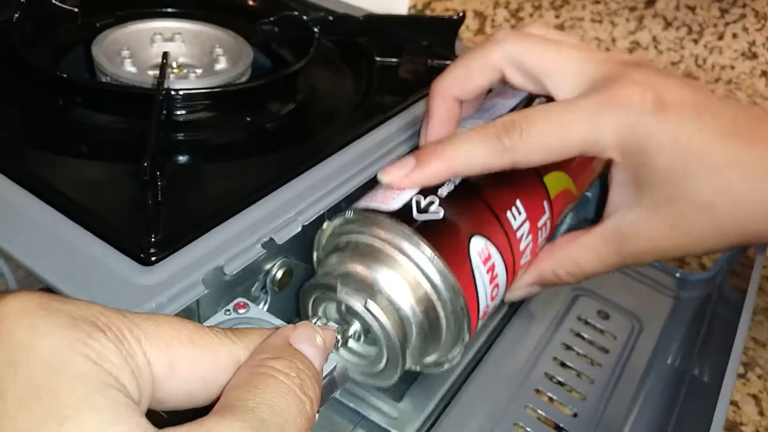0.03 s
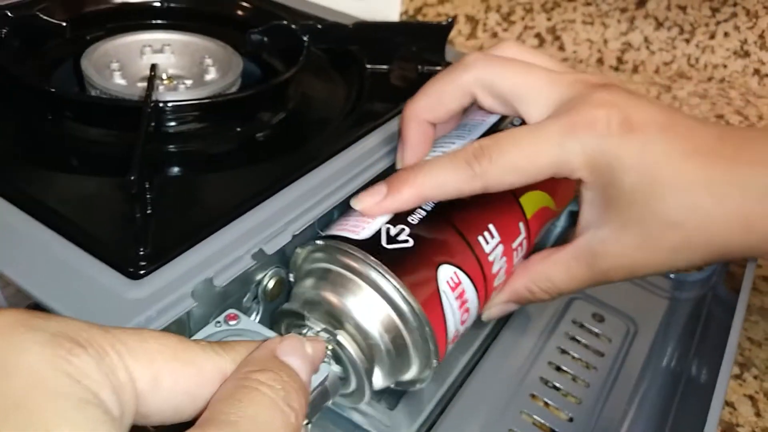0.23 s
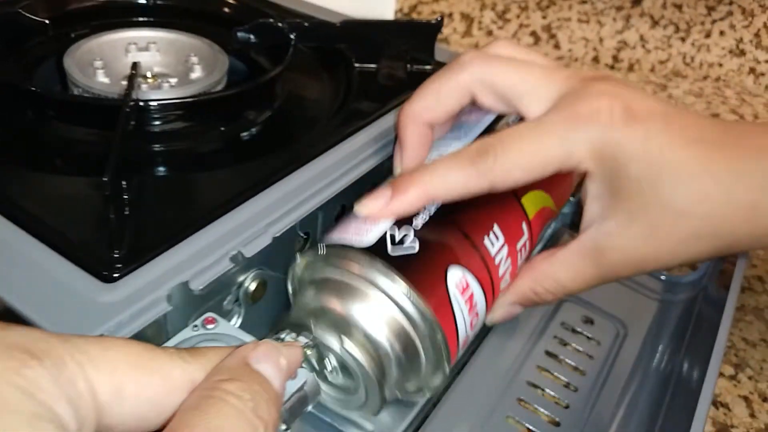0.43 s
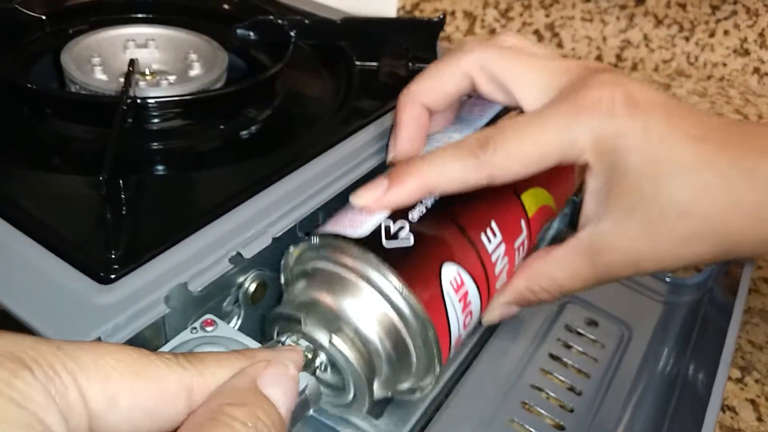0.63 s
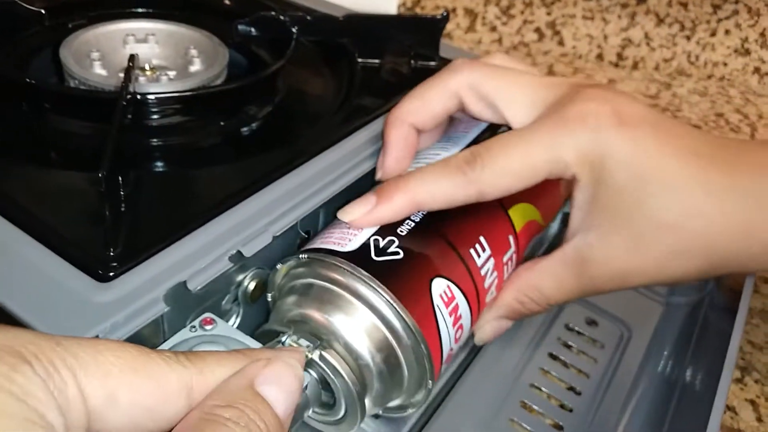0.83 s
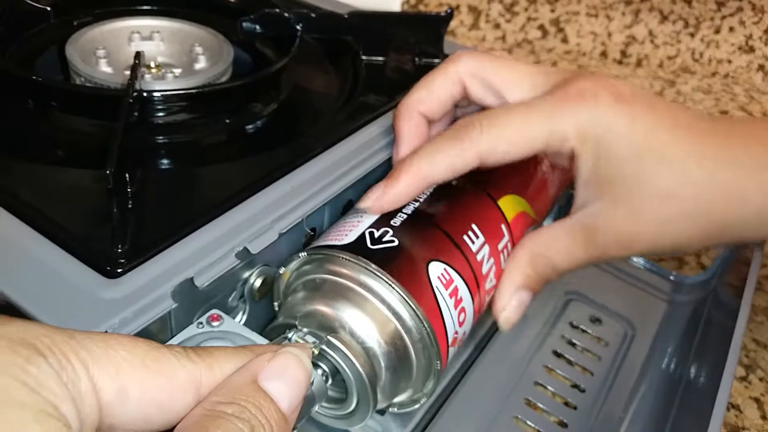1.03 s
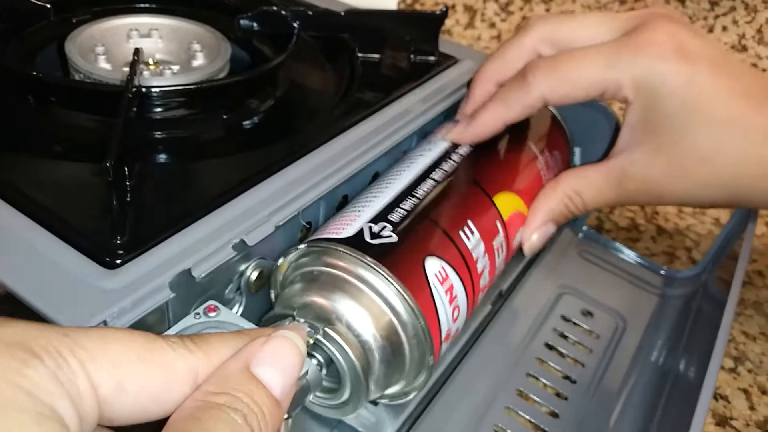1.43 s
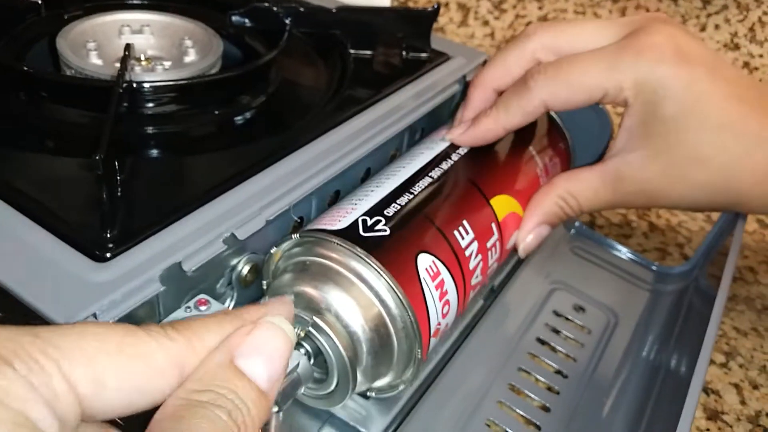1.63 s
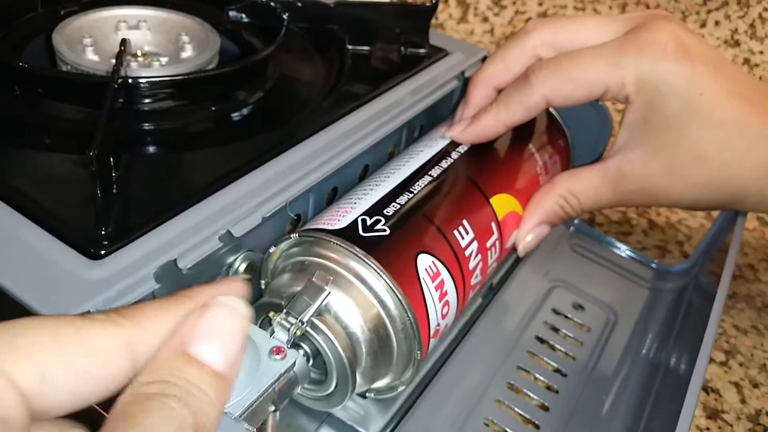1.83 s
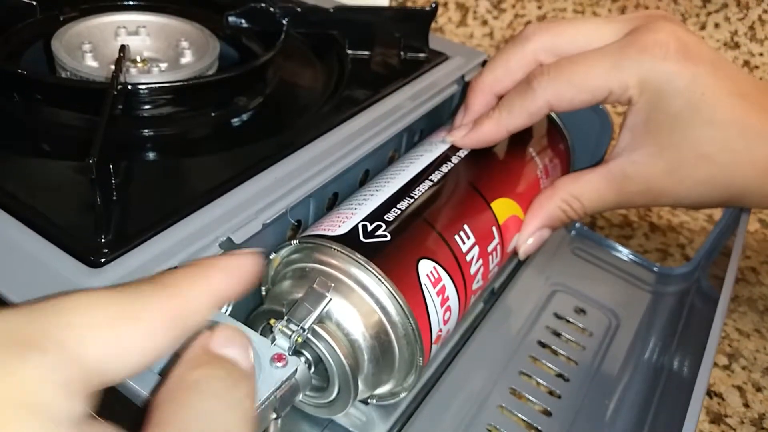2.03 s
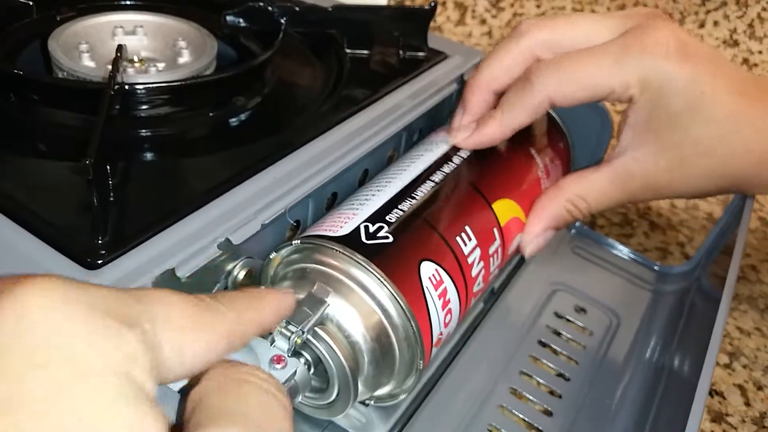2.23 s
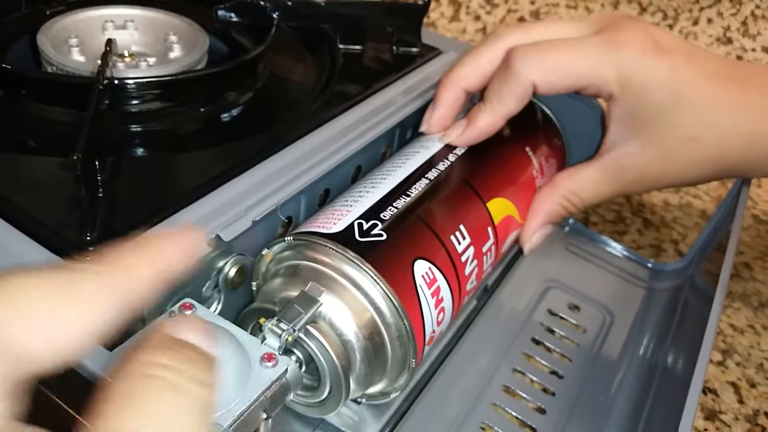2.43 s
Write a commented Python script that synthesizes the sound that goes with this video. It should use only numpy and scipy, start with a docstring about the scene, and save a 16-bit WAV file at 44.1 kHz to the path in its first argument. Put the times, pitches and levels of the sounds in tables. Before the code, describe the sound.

A metal gas canister knocks and rubs against a portable stove, with briefly ringing clanks around 0.2 and 0.4 seconds and lighter taps after. It drops into place with a loud clunk at 1 second and knocks again at 1.5. The locking lever clamps sharply at 1.7. Soft finger thuds follow, then a catch snaps with a clank near 2.25 seconds, over faint hiss and hum in a quiet kitchen.

```python
"""Quiet kitchen: a steel gas canister is seated in a portable stove and clamped by the locking lever.
The can rubs, knocks and rattles against collar and sheet-metal tray, and drops home with a thump.
Knocks of can and lever ring crowded and distinct metal modes. Fingers push on the case;
the lever's spring catch snaps. The room reflects it all over faint hiss and a hollow hum."""
import sys
import numpy as np
from scipy import signal
from scipy.io import wavfile

SR = 44100
rng = np.random.default_rng(int(sys.argv[2]) if len(sys.argv) > 2 else 0)


def generate_wav(signal):
    """Clip the signal to [-1, 1] and save it as 16-bit WAV at the path in sys.argv[1]."""
    frames = np.transpose(np.atleast_2d(signal))
    scaled = np.clip(frames, -1, 1) * 32767
    pcm = np.round(scaled).astype(np.int16)
    wavfile.write(sys.argv[1], SR, pcm)


N = 114660
TIME_S = np.arange(N) / SR
EDGES_HZ = np.geomspace(25, 17000, 29)
CENTRES_HZ = np.sqrt(EDGES_HZ[1:] * EDGES_HZ[:-1])
BASS_HZ, BODY_HZ, TREBLE_HZ = 650, 2490, 9000

# hiss spectrum: f/Hz, relative density/dB
HISS_SPECTRUM = [(30, -33), (150, -33), (450, -5), (1000, -2.5), (2000, -19), (5000, -27.5), (16000, -32)]
# can sliding: t/s, level/dB
RUB_LEVELS = [(0, -51), (.11, -63), (.16, -44), (.5, -48.5), (.7, -48.5), (.92, -43), (1.2, -42),
              (1.25, -47.5), (1.3, -43), (1.37, -61), (1.44, -52), (1.5, -41), (1.58, -55), (1.97, -47.5),
              (2.04, -61), (2.17, -49.5), (2.23, -56), (2.6, -57)]
# rub spectrum: f/Hz, relative density/dB
RUB_SPECTRUM = [(60, -60), (200, -35), (420, -8), (950, 2), (1700, -2.5), (3500, -12), (7000, -31),
                (15000, -38.5)]
# distinct modes of can and tray: f/Hz, relative level/dB, t60/s
CAN_MODES = [(311, -23, .68), (774, -22, .27), (1015, -22, .36), (1124, -21.5, .4), (1398, -19, .3),
             (1575, -15, .48), (1731, -16, .28), (1794, -17, .24), (1900, -19, .25), (2064, -13, .17),
             (2490, -14.5, .17), (2630, -14, .12), (2987, -15, .12), (3257, -17, .14)]
# knocks of can and locking lever on the stove (lever clamps at 1.7155 s), and at 2.139 s a dull finger push on
# the case that rings one mode: # t/s, level/dB, bass/dB, treble/dB, clatter t60/s at BODY_HZ, # then any hard-
# struck modes as (f/Hz, level/dB re knock)
KNOCKS = [(.137, -35.5, 11.5, -8, .37), (.202, -22, -.5, 2, .14, (1405, -7), (1798, -4), (2643, -6),
          (4112, -6)), (.379, -17, -9, -1, .088, (2465, -3), (2890, -1)),
          (.383, -20.5, 2.5, -4, .18, (1195, 2), (1394, 1.5)), (.476, -37.5, 10, -26, .062),
          (.541, -26.3, 10, -5, .19, (775, -3), (1125, 3)), (.606, -33.5, -5, 4, .15, (2010, -3)),
          (.748, -27.5, 10, 7, .2, (1017, 1)), (.764, -27, 1, 0, .12, (2890, -.5)),
          (.851, -37.5, 13.5, -5, .17), (.897, -46.5, 18, 1, .058), (.987, -12, -.5, 0, .13, (1991, -2.5),
          (2621, -3), (3133, -4)), (.999, -19, -2, 4, .16, (1808, 2), (2250, 2.5)),
          (1.022, -21.5, -.5, -1, .19, (1034, -1), (1600, 0)), (1.099, -33, 3, -11, .06, (1620, 3)),
          (1.259, -38.5, 2.5, -10.5, .4), (1.382, -34.5, 2, -1, .07, (4200, -5)), (1.403, -43, 5, 19, .1),
          (1.454, -39, 8, -3, .12), (1.5145, -22, 4, -4, .1, (1728, 2), (2470, 0), (3133, -3.5),
          (4247, -1)), (1.7155, -12.3, -8, 11.5, .078, (1991, -2.5), (4091, -6.5), (5071, -12), (6950, -10),
          (11650, -13)), (1.724, -21.5, 3.5, -7, .19, (1765, 1), (2998, 1)),
          (2.139, -54, 12, -20, .15, (1443, 9)), (2.268, -13.5, -7, -5, .13, (1130, -9.5), (1792, -2)),
          (2.277, -15.5, -3, -8, .13, (2007, -5), (3256, -4))]
# crowded short modes of can and tray: f/Hz, relative density/dB
CLATTER_SPECTRUM = [(30, -62), (140, -64.5), (230, -27.5), (310, -10.5), (420, -17.5), (600, -14.5),
                    (950, -2), (2000, -1.5), (3200, -0.5), (5500, -11), (8000, -25.5), (11000, -17.5),
                    (13500, -59), (16000, -45)]
# thump on the counter: f/Hz, relative density/dB
THUMP_SPECTRUM = [(30, 0.5), (100, -13), (200, 0), (500, -26), (2000, -50)]
# fingers on the case: t/s, level/dB
PUSHES = [(2.054, -35.5), (2.073, -37.5), (2.458, -45), (2.483, -43.5)]
# pushed case: f/Hz, relative density/dB
PUSH_SPECTRUM = [(150, -55), (300, -40), (450, -21), (620, 3), (950, -1.5), (1200, -11), (2500, -26.5),
                 (6000, -48.5)]
# spring catch, hit and bounce: t/s, level/dB
CATCH_HITS = [(2.2362, -16.5), (2.242, -30)]
# catch modes: f/Hz, level/dB re hit, t60/s
CATCH_MODES = [(2987, -8, .1), (3170, -1, .11), (3980, -8, .044), (5750, -14, .06), (9740, -14, .022)]
# catch snap: f/Hz, relative density/dB
SNAP_SPECTRUM = [(100, -44), (700, -3.5), (2000, -2), (3100, 4), (5000, -4), (8000, -19), (10000, -11),
                 (15000, -31)]
# kitchen reverberation: f/Hz, t60/s
ROOM_T60 = [(100, .4), (300, .7), (600, 0.62), (1500, 0.22), (4000, 0.27), (12000, 0.39)]


def from_db(db):
    """Decibels to gain."""
    return 10 ** (np.asarray(db) / 20)


def at_hz(points, hz):
    """Table lookup on a log-frequency axis."""
    points_hz, values = np.transpose(points)
    return np.interp(np.log(hz), np.log(points_hz), values)


def noise_bands():
    """Third-octave noise bands, rms 1 each."""
    white = rng.standard_normal((2, N))
    filters = [signal.butter(2, EDGES_HZ[k:k + 2], "band", fs=SR, output="sos")
               for k in range(len(CENTRES_HZ))]
    bands = np.array([signal.sosfilt(sos, white[k % 2]) for k, sos in enumerate(filters)])
    return bands / bands.std(axis=1, keepdims=True)


def band_gains(spectrum):
    """Band gains of total power 1."""
    gains = from_db(at_hz(spectrum, CENTRES_HZ)) * np.sqrt(np.diff(EDGES_HZ))
    return gains / np.linalg.norm(gains)


def noise(spectrum):
    """Shaped noise, rms about 1."""
    return band_gains(spectrum) @ noise_bands()


def decay(t60_s, size=SR // 2, attack_s=.0011):
    """Fast attack, exponential fall; one row per t60."""
    t = TIME_S[:size]
    return (1 - np.exp(-t / attack_s)) * np.exp(-np.log(1000) * t / np.asarray(t60_s)[..., None])


def ring(hz, t60_s):
    """One struck mode, random phase."""
    return decay(t60_s, size=SR) * np.sin(2 * np.pi * (hz * TIME_S[:SR] + rng.random()))


def add(out, start_s, sound):
    """Mix a sound in at start_s."""
    start = int(start_s * SR)
    out[..., start:start + sound.shape[-1]] += sound[..., :N - start]


def tilt_db(hz, bass_db, treble_db):
    """Bass and treble emphasis re BODY_HZ."""
    return at_hz([(100, 0), (BASS_HZ, bass_db), (BODY_HZ, 0), (TREBLE_HZ, treble_db)], hz)


def radiate(x, corner_hz=170):
    """A small body radiates little bass."""
    return signal.sosfilt(signal.butter(2, corner_hz, "high", fs=SR, output="sos"), x)


def background(hiss_db=-59.5, hum_db=-62):
    """Faint hiss and a noise-driven hollow resonance."""
    drive = rng.standard_normal(N + SR)
    hum = radiate(signal.fftconvolve(drive, ring(hz=314, t60_s=.16))[SR:SR + N])
    return from_db(hiss_db) * noise(HISS_SPECTRUM) + from_db(hum_db) * hum / hum.std()


def rubbing(slips_per_s=180, spread_db=3.5, ring_db=-9):
    """The can slides in tiny uneven slips; each scrapes and rings can and tray."""
    onsets = rng.random(N) < slips_per_s / SR
    slips = onsets * from_db(spread_db * np.minimum(rng.exponential(1, N), 3))
    power = np.maximum(signal.fftconvolve(slips ** 2, decay(t60_s=.18) ** 2)[:N], 0)
    modes = sum(from_db(db + at_hz(RUB_SPECTRUM, hz)) * ring(hz, t60_s) for hz, db, t60_s in CAN_MODES)
    ringing = signal.fftconvolve(slips, modes)[:N]
    scrape = np.sqrt(power / power.mean()) * noise(RUB_SPECTRUM)
    level = from_db(np.interp(TIME_S, *np.transpose(RUB_LEVELS)))
    return radiate(level * (scrape + from_db(ring_db) * ringing / ringing.std()))


def knocks(clatter_db=.4):
    """Can and lever ring crowded and distinct modes; broad contacts favour bass, edges treble."""
    envelopes, tones = np.zeros((len(CENTRES_HZ), N)), np.zeros(N)
    t60_scale = np.minimum((CENTRES_HZ / BODY_HZ) ** -.36, 1.15)  # treble dies sooner
    for start_s, db, bass_db, treble_db, t60_s, *struck in KNOCKS:
        band_db = db + clatter_db + tilt_db(CENTRES_HZ, bass_db, treble_db)
        gains = band_gains(CLATTER_SPECTRUM) * from_db(band_db)
        for hz, mode_db in struck:
            gains *= cluster_gains(hz)
            add(tones, start_s, from_db(db + mode_db) * struck_mode(hz))
        for hz, mode_db, mode_t60_s in CAN_MODES:
            gain = from_db(db + mode_db + tilt_db(hz, bass_db, treble_db))
            add(tones, start_s, gain * ring(hz, mode_t60_s))
        add(envelopes, start_s, gains[:, None] * decay(t60_s * t60_scale))
    clatter = (envelopes * noise_bands()).sum(0)
    return radiate(clatter + tones)


def cluster_gains(hz, lift_db=1.5, width_oct=.15):
    """Neighbours of a hard-struck mode join in."""
    return from_db(lift_db * np.exp(-(np.log2(CENTRES_HZ / hz) / width_oct) ** 2))


def struck_mode(hz, twin_detune=.012, twin_db=-7):
    """A hard-struck mode beats with a weaker twin, as in a can not quite round."""
    t60_s = .12 * (hz / BODY_HZ) ** -.55
    return ring(hz, t60_s) + from_db(twin_db) * ring(hz * (1 + twin_detune), t60_s)


def seating(start_s=.986, level_db=-38):
    """The can drops home and thumps the counter."""
    envelope = np.zeros(N)
    add(envelope, start_s, from_db(level_db) * decay(t60_s=.033))
    return envelope * noise(THUMP_SPECTRUM)


def finger_pushes():
    """Fingers push on the case: dull thuds."""
    envelope = np.zeros(N)
    for start_s, db in PUSHES:
        add(envelope, start_s, from_db(db) * decay(t60_s=.14))
    return radiate(envelope * noise(PUSH_SPECTRUM))


def spring_catch(snap_db=-3.5):
    """The lever's catch snaps, pings and bounces once."""
    snap_envelope, ping = np.zeros(N), np.zeros(N)
    for start_s, db in CATCH_HITS:
        add(snap_envelope, start_s, from_db(db + snap_db) * decay(t60_s=.068))
        for hz, mode_db, t60_s in CATCH_MODES:
            add(ping, start_s, from_db(db + mode_db) * ring(hz, t60_s))
    return ping + snap_envelope * noise(SNAP_SPECTRUM)


def kitchen(x, level_db=-8.5, treble_db=-13, delay_s=.0061):
    """Diffuse reflections, longest in the low mids."""
    tails = noise_bands()[:, -SR:] * decay(at_hz(ROOM_T60, CENTRES_HZ), size=SR)
    tails /= np.linalg.norm(tails, axis=1, keepdims=True)
    gains = np.sqrt(2 * np.diff(EDGES_HZ) / SR) * from_db(level_db + tilt_db(CENTRES_HZ, 0, treble_db))
    reflections = np.zeros(N)
    add(reflections, delay_s, signal.fftconvolve(x, gains @ tails))
    return reflections


def scene():
    """Stove, room and background; mono."""
    stove = knocks() + spring_catch() + seating() + finger_pushes() + rubbing()
    return (stove + kitchen(stove) + background())[None]


def record(dry):
    """Soft clip, then steep low-pass."""
    ceiling, cutoff_hz = 1.1, 16100
    lowpass = signal.ellip(10, .1, 80, cutoff_hz, fs=SR, output="sos")
    return signal.sosfilt(lowpass, ceiling * np.tanh(dry / ceiling))


dry = scene()
out = record(dry)
generate_wav(out)
```